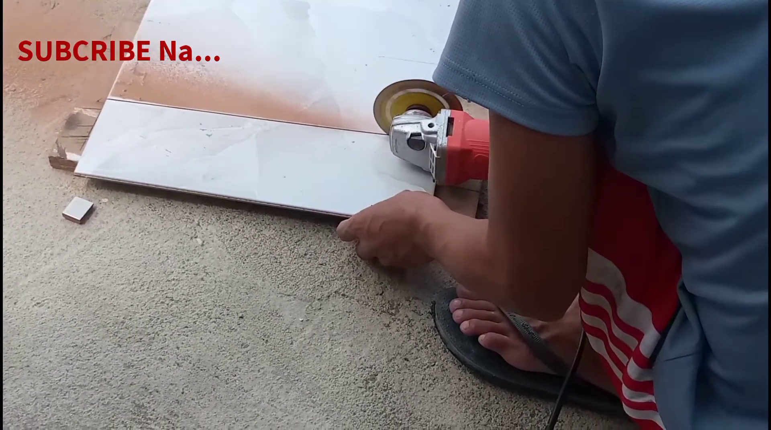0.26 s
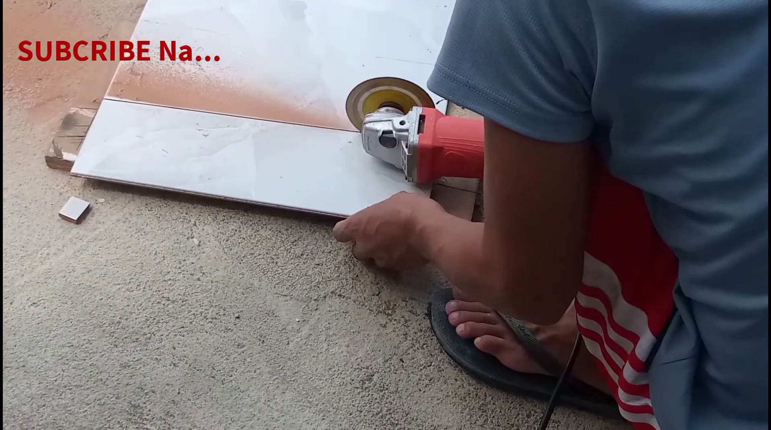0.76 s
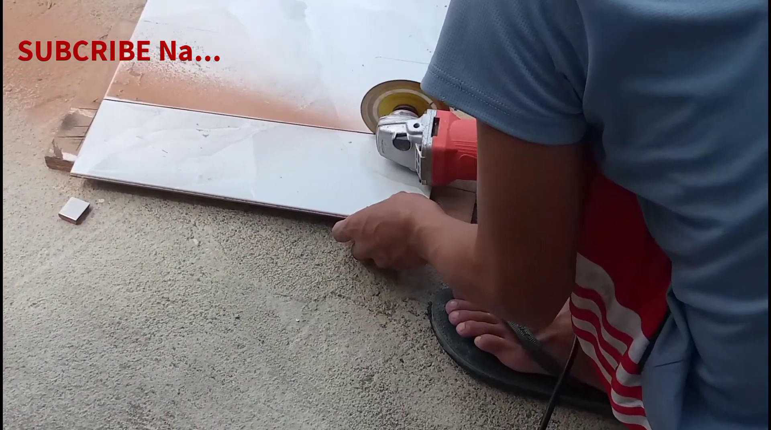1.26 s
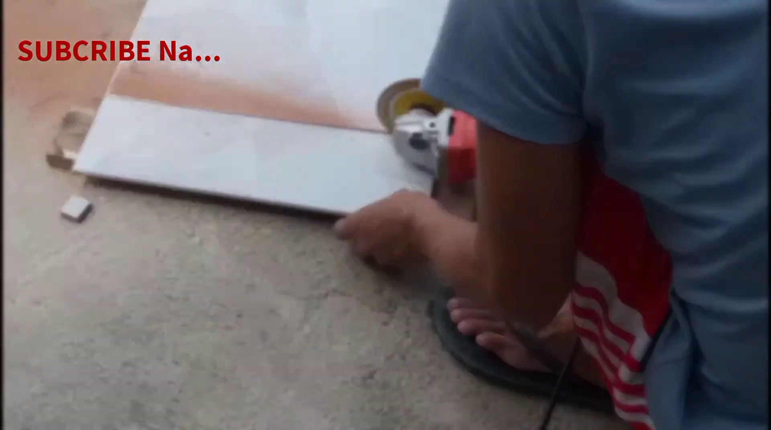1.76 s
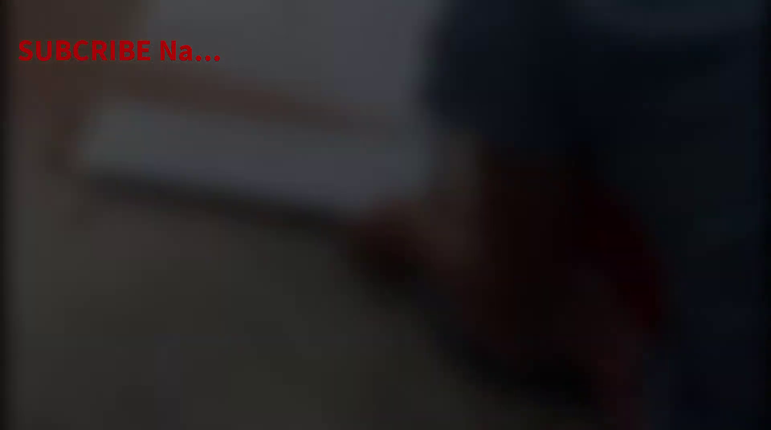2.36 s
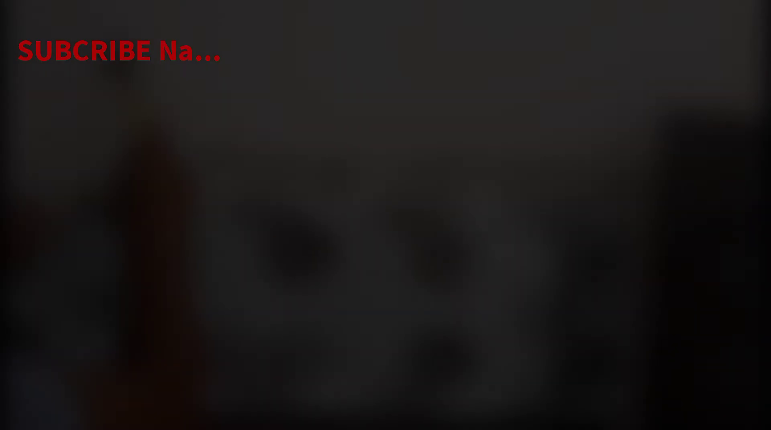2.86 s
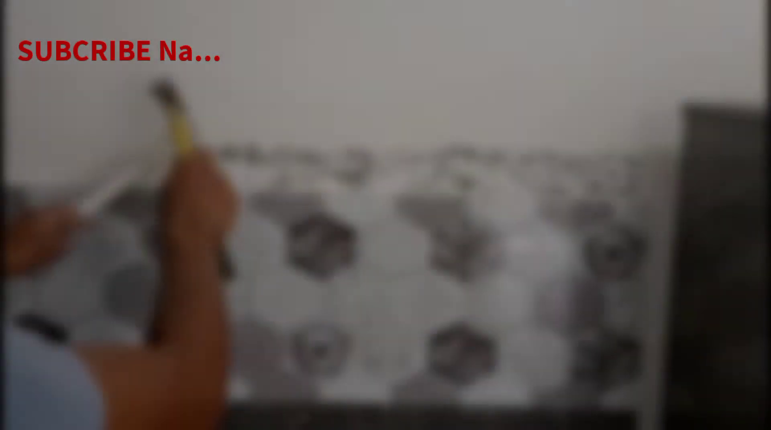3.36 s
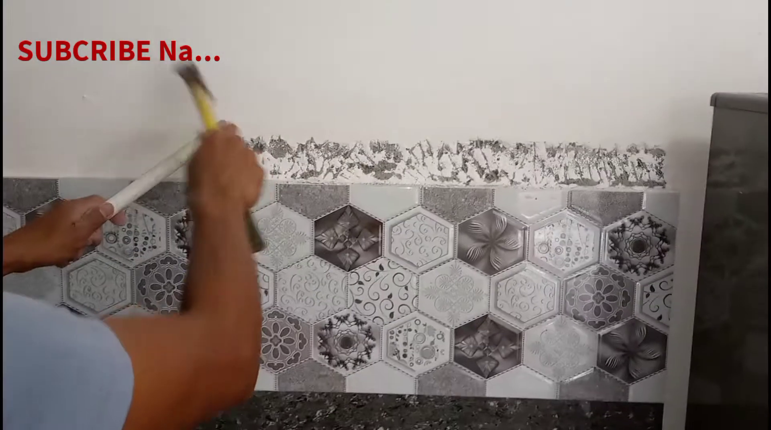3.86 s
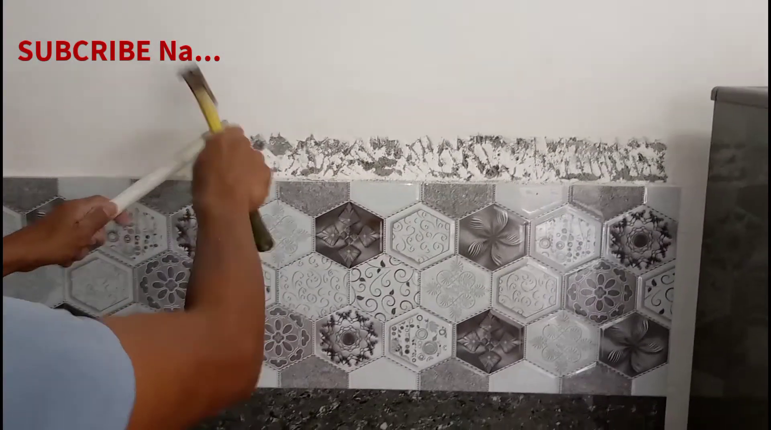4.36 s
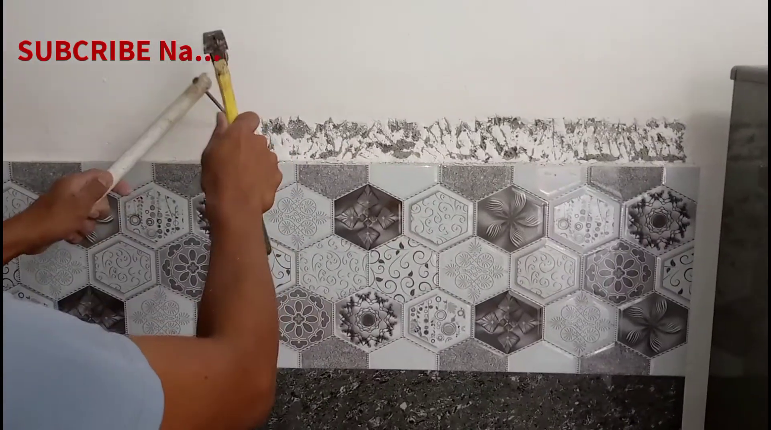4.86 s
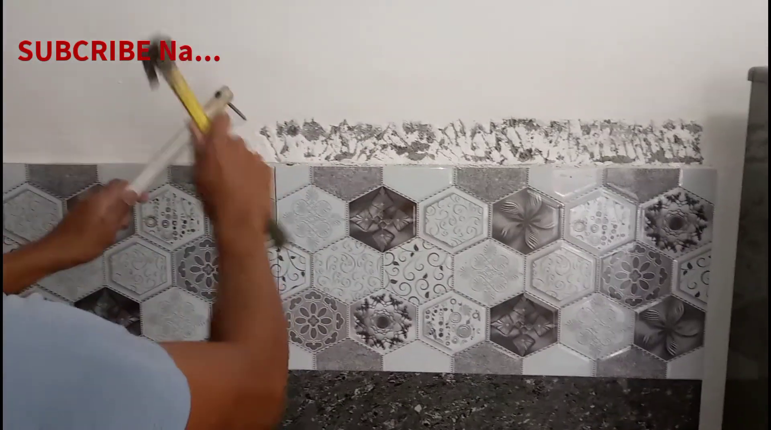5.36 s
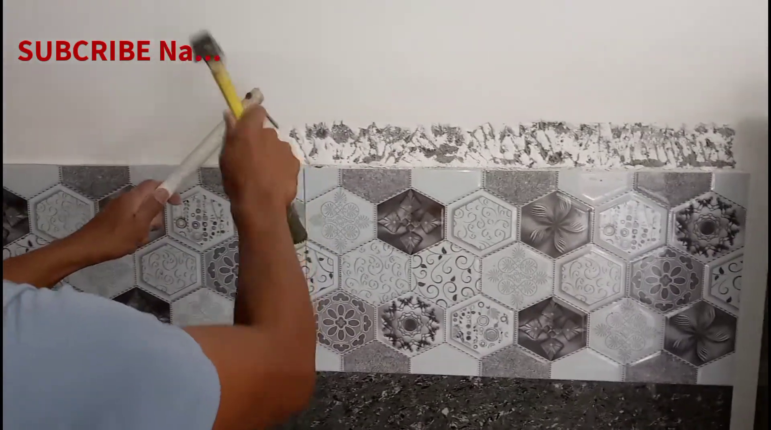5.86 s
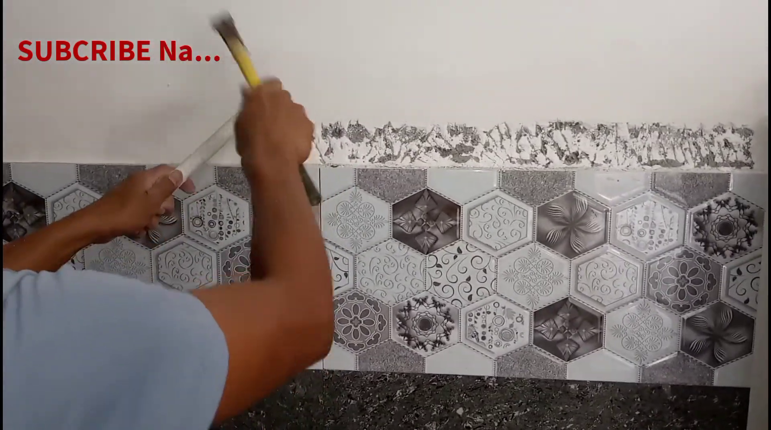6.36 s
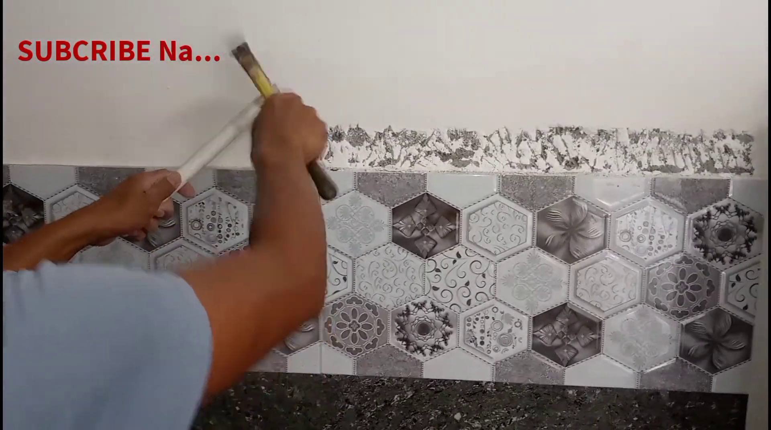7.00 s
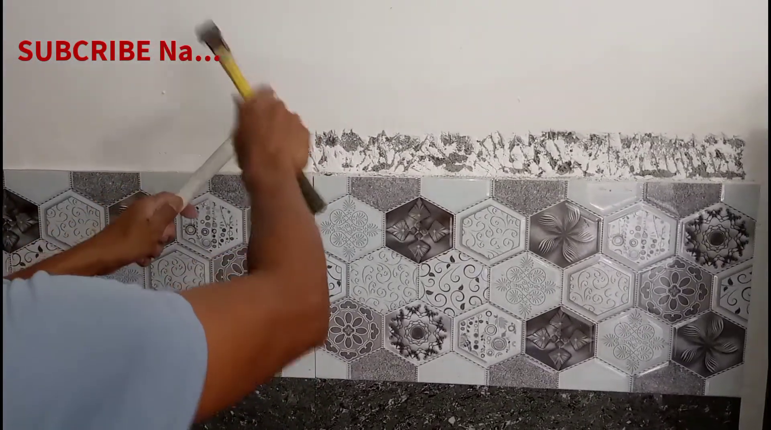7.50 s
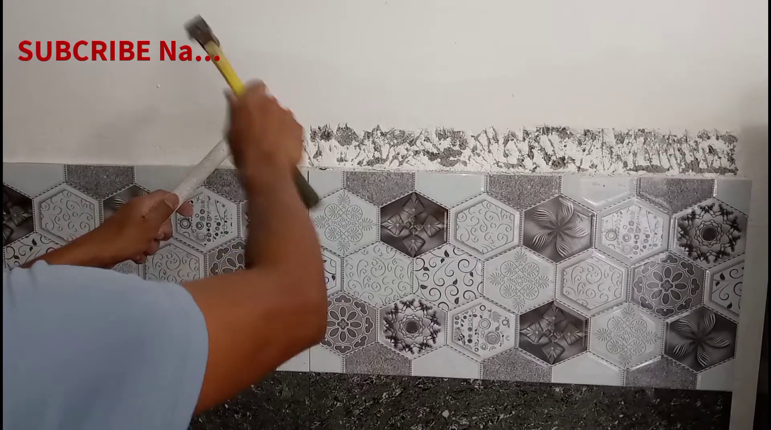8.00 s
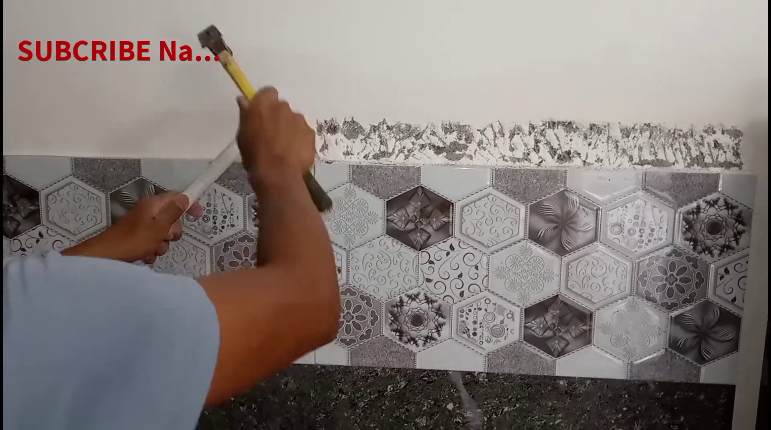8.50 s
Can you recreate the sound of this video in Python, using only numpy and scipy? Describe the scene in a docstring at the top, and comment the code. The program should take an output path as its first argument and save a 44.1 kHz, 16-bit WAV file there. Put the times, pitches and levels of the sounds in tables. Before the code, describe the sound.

A nearby angle grinder bites into a ceramic tile outdoors, gritty and shrill, squealing briefly as its pitch rises before it cuts off abruptly. After a short lull, the sound is indoors: a hammer hits a steel chisel against a plaster wall about four times a second. Six sharp, clinking blows echo in the bare room, then a pause with light ticks, then twelve more.

```python
"""An angle grinder cuts a ceramic tile outdoors, near the microphone: diamond grit scrapes, blade and tile
ring, the motor whines as its speed wavers and climbs. It stops dead. Then, in a bare echoing room,
a hammer drives a chisel into wall plaster, about four blows a second in two runs: steel clinks,
plaster cracks, the wall thuds. Small ticks come as the chisel is set again, over a faint hiss."""
import sys
import numpy as np
from scipy import signal
from scipy.io import wavfile

SR = 44100
rng = np.random.default_rng(int(sys.argv[2]) if len(sys.argv) > 2 else 0)


def generate_wav(sig):
    """Save sig (samples, or channels by samples) to the path in sys.argv[1] as 16-bit PCM at SR."""
    pcm = np.round(np.clip(np.atleast_2d(sig).T, -1, 1) * 32767).astype(np.int16)
    wavfile.write(sys.argv[1], SR, pcm)


N = 385434
TIME = np.arange(N) / SR
HZ = np.fft.rfftfreq(16384, 1 / SR)
STOP_S, ROOM_S = 2.685, 2.788  # the grinder ends, the room begins
CATCH_S = 2.197  # the blade binds in the cut
# speed of the blade: (time [s], speed [turns/s])
BLADE_SPEED = [(0.03, 114.47), (0.25, 114.8), (0.55, 116.67), (0.7, 119.97), (0.85, 125.6), (1.02, 125.9),
               (1.15, 121.9), (1.3, 121.13), (1.55, 122.1), (1.65, 124.17), (1.8, 125.67), (1.95, 125.7),
               (2.1, 127.77), (2.22, 127.87), (2.35, 132.17), (2.5, 136.2), (2.66, 139.73)]


def scrape(grains_per_s=9000, level_db=-15.5, split_hz=5700, freed_s=0.05):
    """Diamond grains strike the tile, hardest once a turn, and ring blade and tile."""
    # spectrum of grit on ceramic: (frequency [Hz], level [dB])
    spectrum = [(900, -44.5), (1500, -31), (2030, -14), (2520, -5.5), (3200, -5.5), (3650, -1.5),
                (4250, -1), (4800, -3.5), (5400, -11.5), (5900, -16.5), (7300, -16), (8100, -35.5),
                (13600, -29.5), (15400, -18.5)]
    # resonances of blade and tile: (frequency [Hz], width [Hz], gain [dB])
    modes = [(2490, 30, 3), (2588, 26, 5), (2790, 26, 2), (3069, 45, 0), (3509, 30, -4), (3640, 55, -7),
             (4118, 28, 4), (4635, 24, -1), (4793, 24, -3), (4997, 50, 4), (5251, 32, 4), (5654, 35, 6),
             (6570, 70, 0), (7050, 200, -1), (8370, 140, 1), (9650, 100, 9), (11320, 110, 3),
             (11850, 80, 10), (13480, 80, 10)]
    turns, load = np.cumsum(blade_speed()) / SR, load_db()
    grains = (rng.random(N) < grains_per_s / SR) * rng.choice([-1, 1], N)
    grains = grains * amp(np.minimum(rng.exponential(1, N), 5))
    wobble = 0.12 * np.cos(2 * np.pi * turns + 0.5 * wander(24))
    pressure = 1 + wobble + 0.045 * wander(700) + 0.078 * wander(50)
    grit = colour(pressure * (unit(grains) + 0.63 * rng.standard_normal(N)), amp(read(spectrum)))
    freed = np.clip((TIME - CATCH_S) / freed_s, 0, 1)  # past the catch the blade runs freer
    grit = grit - 0.36 * freed * colour(grit, hump(2350, 450))  # the tile's own band weakens
    drive_db = -5 + 1.4 * load - 9 * freed  # a deeper cut rings the modes harder
    # as the point of contact moves, each mode is fed more or less
    rung = grit + sum(colour(grit * amp(drive_db + db + 4.5 * wander(12)), hump(hz, width))
                      for hz, width, db in modes)
    treble = 1 / (1 + (split_hz / (HZ + 1)) ** 20)
    ringing = amp(load) * unit(colour(rung, 1 - treble))
    dust = amp(-7 + 0.69 * load) * unit(colour(rung, treble))
    return amp(level_db) * (ringing + dust)


def load_db(give_s=0.012, rebuild_s=0.16):
    """Bite of the cut: it eases as a flake of tile gives way, builds again, and grows a little with speed."""
    # flakes giving way: (time [s], drop [dB])
    flakes = [(.35, 1.5), (.6, 1.5), (.7, 1.5), (1.16, 2.5), (1.59, 0.5), (1.94, 2.5), (2.16, 4.5),
              (2.56, 2.5)]
    eased = sum(drop * np.clip((TIME - s) / give_s, 0, 1) * np.exp(-abs(TIME - s) / rebuild_s)
                for s, drop in flakes)
    return 0.0151 * overspeed() - eased


def motor(gear_order=10, fan_order=30, waver=0.0013):
    """Armature, gear and fan whine on multiples of the blade speed."""
    # lesser tones of the motor: (multiple of the blade speed, level [dB])
    tones = [(3.65, -58), (3.95, -59), (8, -55), (12, -55), (20, -41), (60, -46), (118.2, -45)]
    turns = np.cumsum(blade_speed() * (1 + waver * wander(60))) / SR
    whine = sum(gear_head(k) * amp(db + 3 * wander(12)) * np.sin(2 * np.pi * (k * turns + rng.random()))
                for k, db in tones)
    gear_db = -52 + 0.42 * overspeed() + 2.6 * wander(30)
    gear = gear_head(gear_order) * amp(gear_db) * unit(np.sin(2 * np.pi * gear_order * turns))
    fan = amp(-23.5 + 2 * wander(16)) * np.sin(2 * np.pi * fan_order * turns)
    return whine + gear + fan


def gear_head(order):
    """Gain of a motor tone as it sweeps through the resonances of the gear head."""
    # gear head resonances: (frequency [Hz], width [Hz], gain [dB])
    modes = [(533, 15, 11), (1154, 28, 13), (1265, 10, 11.5), (1324, 16, 16), (1417, 14, 15)]
    return np.interp(order * blade_speed(), HZ, resonances(modes))


def cooling_air():
    """Air rushes through the grinder, coloured by its tinny guard and housing."""
    # spectrum of the airflow: (frequency [Hz], level [dB])
    spectrum = [(25, -31), (70, -22.5), (150, -20), (338, -19), (420, -13), (700, -9.5), (900, -8),
                (1130, -4), (1550, -4), (2000, -5.5), (2600, -25), (4400, -63)]
    # resonances of guard and housing: (frequency [Hz], width [Hz], gain [dB])
    guard = [(480, 79, -2), (619, 26, 3), (740, 26, 3.5), (1003, 68, 3.5)]
    air = unit(colour(rng.standard_normal(N), amp(read(spectrum)) * resonances(guard)))
    return amp(-38.5 - 0.02 * overspeed() + wander(14)) * air


def singing(waver_hz=11):
    """Single modes of the tile swell and die as the blade rubs its edge."""
    # swells of the tile: (time [s], half length [s], frequency [Hz], level [dB])
    swells = [(0.196, 0.24, 792, -34), (0.115, .2, 5070, -22.5), (0.253, .15, 4118, -16),
              (.98, .1, 760, -46), (1.141, .04, 4960, -19), (1.427, 0.74, 732, -43.5),
              (1.55, .04, 4118, -21.5), (1.916, 0.056, 758, -37.5), (2.255, .1, 2600, -24.5)]
    out = np.zeros(N)
    for s, half_s, hz, db in swells:
        phase = 2 * np.pi * np.cumsum(hz + waver_hz * wander(60)) / SR
        swell = amp(db) / (1 + ((TIME - s) / half_s) ** 2) ** 2
        out += swell * (1 + 0.57 * wander(50)) * np.sin(phase)
    return out


def squeal(half_s=0.016, level_db=-10.5):
    """The binding blade rings on a few of its modes for a moment."""
    # modes of the binding blade: (frequency [Hz], width [Hz], gain [dB])
    modes = [(1690, 25, -14), (2590, 22, 0), (3050, 26, -1), (3450, 100, -3), (4120, 26, 2),
             (5650, 25, -12), (6260, 29, -7), (7000, 27, -9)]
    rub = rng.standard_normal(N) / (1 + ((TIME - CATCH_S) / half_s) ** 10)
    return amp(level_db) * colour(rub, unit(resonances(modes, base=0)))


def bumps(low_cut_hz=55):
    """Short dull low thumps with no ring, heard during the cut."""
    # low thumps: (time [s], level [dB], decay [s], upper edge [Hz])
    thumps = [(1.862, -43, 0.029, 300), (2.207, -29.5, 0.0037, 280), (2.559, -44, .02, 250),
              (2.595, -27, 0.0046, 800)]
    out, t = np.zeros(N), TIME[:SR // 4]
    for s, db, decay, top_hz in thumps:
        band = unit(HZ ** 2 / (HZ ** 2 + low_cut_hz ** 2) / (1 + (HZ / top_hz) ** 3))
        thump = colour(rng.standard_normal(len(t)) * np.exp(-t / decay), band)
        add(out, s, amp(db) * thump / np.sqrt(np.sum(thump ** 2) / (decay * SR)))
    return out


def hammer(same_paths=0.6, ring_t60=0.49, lag_s=0.0002):
    """Steel clinks on steel; each blow cracks plaster, thuds in the wall and rings the chisel."""
    # blows: (time [s], strength [dB], tip frequency [Hz], then relative tip [dB], thud [dB], dust [dB])
    blows = [(3.4484, -9, 5780, -15.5, -27.5, -25), (3.6935, -12.5, 6060, -13, -22.5, -16),
             (3.9302, -11, 6130, -12, -27.5, -34), (4.1982, -12.5, 6120, -9, -19.5, -19),
             (4.4516, -11, 6890, -16.5, -23.5, -18.5), (4.7, -8, 5870, -16, -29, -21.5),
             (5.6167, -5, 6370, -18, -31.5, -29), (5.883, -7.5, 6280, -16, -22.5, -24.5),
             (6.1443, -5, 5640, -24, -22, -29.5), (6.4076, -10, 5540, -40, -17.5, -27),
             (6.6577, -7.5, 6590, -39, -26, -41), (6.9166, -7, 6170, -16, -27.5, -29),
             (7.1906, -8.5, 5750, -18.5, -27.5, -28.5), (7.4458, -8, 6600, -15, -25.5, -25),
             (7.7094, -5.5, 6800, -40, -32.5, -36), (7.9624, -6, 6500, -18, -30, -20),
             (8.2295, -7.5, 6560, -17, -32, -18), (8.4882, -4.5, 5800, -23, -34, -36.5)]
    # chisel set on a new spot: (time [s], clink [Hz], clink [dB], chips [Hz], chips [dB], ring [dB])
    seats = [(3.0, 3430, -14.5, 12100, -27, -19), (5.5, 4030, -14, 11750, -24.5, -26)]
    # spectrum of cracking plaster: (frequency [Hz], level [dB])
    crack_spectrum = [(300, -27.5), (800, -10.5), (1300, -9), (2300, -1.5), (3700, 1), (4400, 0.5),
                      (5100, -7), (5600, -6.5), (6800, 0.5), (7500, -11), (8300, -17), (10000, -14.5),
                      (13300, -12), (15500, -10.5)]
    # spectrum of the wall's thud: (frequency [Hz], level [dB])
    thud_spectrum = [(25, -32), (50, -23), (75, 5.5), (110, -2.5), (140, -3), (170, -3), (330, -4),
                     (470, -4), (600, -3.5), (760, -9.5), (1200, -11), (3000, -34)]
    # standing waves between the walls: (frequency [Hz], width [Hz], gain [dB])
    room_modes = [(106, 7.9, 9.5), (163.3, 3.8, 14), (191, 2.7, 6.5), (210, 4.1, 5.5), (240, 9.1, 1),
                  (317, 7.6, -11), (337, 20, 7), (438, 18, 7.5), (527, 4.2, -13), (630, 14, 7),
                  (896, 23, 10)]
    # resonances of the seated chisel: (frequency [Hz], width [Hz], gain [dB])
    shaft_modes = [(3270, 120, 1), (4260, 150, -8), (5590, 36, 10.5), (5360, 48, 3)]
    # the chisel's long ring: (frequency [Hz], width [Hz], gain [dB])
    ring_modes = [(5570, 34, -4), (5660, 40, -4), (7330, 260, -8), (7510, 36, 0)]
    out, t = np.zeros(N), TIME[:SR]
    plaster, steel = unit(amp(read(crack_spectrum))), resonances(ring_modes, base=0) ** 2
    wall = unit(amp(read(thud_spectrum)) * resonances(room_modes) * resonances([(290, 110, 4)]))
    # part of the thud takes the same paths through the room at every blow
    common_boom = np.sqrt(same_paths) * room_impact(direct_db=-24)
    for s, strength, tip_hz, tip_db, thud_db, dust_db in blows:
        seated_s, clink_hz, clink_db, chip_hz, chip_db, ring_db = [r for r in seats if r[0] < s][-1]
        depth = sum(seated_s < row[0] < s for row in blows)  # blows since the chisel was set
        body = np.hypot(amp(-17) * plaster, amp(tip_db - 5) * unit(hump(tip_hz, 700) ** 2))
        crack = colour(room_impact(direct_db=7), body * resonances(shaft_modes))
        chips = chipping(depth, chip_hz, chip_db, thud_db, dust_db)
        face = hump(clink_hz * (1 + 0.05 * rng.standard_normal()), 520)  # no two blows land alike
        clink = amp(clink_db - 9) * colour(room_impact(direct_db=16), unit(plaster * face))
        boom = common_boom + np.sqrt(1 - same_paths) * room_impact(direct_db=-26)
        thud = amp(thud_db + 2) * colour(boom, wall)
        ring = amp(ring_db - 4 - 60 * t / ring_t60) * unit(colour(rng.standard_normal(SR), steel))
        add(out, s + lag_s, amp(strength) * (crack + chips + clink + thud + ring))
    return out


def chipping(depth, chip_hz, chip_db, thud_db, dust_db, sink_blows=2.55, usual_thud_db=-23):
    """One blow's snap of chips and dust; the chipping gets lower and fainter as the chisel sinks in."""
    pitch_drop = 0.145 * (1 - np.exp(-depth / sink_blows))
    level_db = chip_db - 0.73 * depth + 0.36 * (thud_db - usual_thud_db)  # a deeper blow chips more
    chips = amp(level_db) * unit(hump(chip_hz * (1 - pitch_drop), 1900) ** 3)
    dust = amp(dust_db - 5) * unit(hump(14950, 1300) ** 3)
    return colour(room_impact(direct_db=12), np.hypot(chips, dust))


def ticks(gain_db=-19):
    """The chisel touches the wall and chips fall, with the room behind them."""
    # light touches: (time [s], level [dB])
    touches = [(3.024, -36.5), (4.1705, -25), (5.008, -32.5), (5.0414, -33), (5.0584, -29.5), (5.0833, -32),
               (5.5692, -45), (8.465, -17)]
    # spectrum of a touch: (frequency [Hz], level [dB])
    spectrum = [(200, -29), (1500, -14), (3000, -11), (4300, -4.5), (5500, -14.5), (7000, -18), (8500, -33),
                (15000, -30)]
    out, tone = np.zeros(N), unit(amp(read(spectrum)))
    for s, db in touches:
        add(out, s, amp(db + gain_db) * colour(room_impact(direct_db=17, click=0.6, crack_s=0.002), tone))
    return out


def room_impact(direct_db, click=1.4, crack_s=0.0022, echo_s=0.0081, early_s=0.0089):
    """An impact at the microphone: click and fracture, an echo off a near wall, then the room's tail."""
    # reverberation of the bare room: (frequency [Hz], t60 [s])
    reverb_times = [(80, 0.43), (210, 0.42), (560, 0.54), (1470, 0.59), (3880, 0.52), (7000, 0.46),
                    (10200, 0.43), (15000, 0.35)]
    t = TIME[:SR]
    hz, when, bands = signal.stft(rng.standard_normal(SR), SR, nperseg=256)
    fill_s = 0.0024 + 5 / (hz[:, None] + 150)  # the bass takes longer to fill the room
    build = 1 - np.exp(-(when + 1e-4) / fill_s)
    decay = amp(-60 * when / read(reverb_times, hz)[:, None])
    tail = signal.istft(bands * build * decay, SR, nperseg=256)[1][:SR]
    fracture = np.exp(-t / crack_s) + amp(-6) * (t > echo_s) * np.exp(-abs(t - echo_s) / crack_s)
    near = (amp(direct_db) * fracture + amp(-2) * np.exp(-t / early_s)) * rng.standard_normal(SR)
    contact = np.arange(SR) == round(SR / 1000)
    return tail + near * np.minimum(t / 0.0018, 1) + click * amp(direct_db) * contact


def yard(x, echo_db=-11, reach_s=0.03, count=14):
    """Ground and nearby walls return a few quick echoes, which ripple the spectrum."""
    taps = np.zeros(SR // 4)
    delay = rng.uniform(0.02937, 1, count)
    taps[(delay * reach_s * SR).astype(int)] = rng.choice([-1, 1], count) * np.exp(-delay)
    taps *= amp(echo_db) / np.linalg.norm(taps)
    taps[0] = 1
    return signal.fftconvolve(x, taps / np.linalg.norm(taps))[:N]


def room_tone(hiss_db=-59, ring_db=-52.5, ring_hz=5698, ring_t60=0.64):
    """The faint hiss of the empty room, and a ring that hangs in it at first."""
    # spectrum of the hiss: (frequency [Hz], level [dB])
    spectrum = [(25, -35), (50, -26), (75, -23), (100, -22), (240, -20.5), (450, -19), (1000, -15.5),
                (1600, -14.5), (2600, -11.5), (4000, -15), (5000, -29.5), (6500, -28), (7700, -47),
                (15500, -60)]
    fade = amp(ring_db - 60 * np.maximum(TIME - ROOM_S, 0) / ring_t60)
    ring = fade * unit(colour(rng.standard_normal(N), hump(ring_hz, 500) ** 2))
    hiss = amp(hiss_db - 1.5 * wander(26)) * unit(colour(rng.standard_normal(N), amp(read(spectrum))))
    return ring + hiss


def blade_speed():
    """Turns per second at every sample."""
    return np.interp(TIME, *np.transpose(BLADE_SPEED))


def overspeed(cruise=125):
    """Turns per second above cruising speed."""
    return blade_speed() - cruise


def amp(db):
    """Decibels to gain."""
    return 10 ** (np.asarray(db) / 20)


def unit(x):
    """Scales to rms 1."""
    return x / np.sqrt(np.mean(abs(x) ** 2) + 1e-20)


def read(points, hz=HZ):
    """Reads a table on a log-frequency axis."""
    f, value = np.transpose(points)
    return np.interp(np.log(hz + 1), np.log(f + 1), value)


def add(mix, s, sound):
    """Mixes a sound in at time s."""
    part = mix[round(s * SR):][:len(sound)]
    part += sound[:len(part)]


def wander(per_s):
    """Smooth random drift of rms 1."""
    count = int(N / SR * per_s) + 4
    drift = signal.resample(rng.standard_normal(count), 4 * count)
    return unit(np.interp(TIME * per_s * 4, np.arange(4 * count), drift))


def hump(hz, width):
    """Gain of one resonance, 1 at its top."""
    return 1 / np.sqrt(1 + (2 * (HZ - hz) / width) ** 2)


def resonances(modes, base=1):
    """Gain of resonances that stand on an even base."""
    return np.sqrt(base + sum((amp(db) * hump(hz, width)) ** 2 for hz, width, db in modes))


def colour(x, gain):
    """Causal filter with the given gain, so that nothing rings before its cause."""
    log_gain = np.log(np.maximum(gain, 1e-6))
    mirrored = np.concatenate([log_gain, log_gain[-2:0:-1]])
    taps = np.fft.ifft(np.exp(np.conj(signal.hilbert(mirrored)))).real[:len(HZ)]
    return signal.fftconvolve(x, taps)[:len(x)]


def scene():
    """The grinder outdoors, a moment of silence, then the room; mono on both channels."""
    outdoors = yard(scrape()) + cooling_air() + motor() + singing() + squeal() + bumps()
    outdoors *= np.clip((STOP_S - TIME) / 0.0012, 0, 1)
    indoors = (hammer() + ticks() + room_tone()) * np.clip((TIME - ROOM_S) / 0.025, 0, 1)
    return np.tile(outdoors + indoors, (2, 1))


def record(dry, ceiling=0.76, low_cut_hz=48, top_hz=15520):
    """A small microphone loses the deepest bass; loud peaks are rounded and the top treble is cut."""
    thin = signal.sosfilt(signal.butter(3, low_cut_hz, "high", fs=SR, output="sos"), dry)
    lowpass = signal.firwin(511, top_hz, window=("kaiser", 8), fs=SR)
    return signal.oaconvolve(ceiling * np.tanh(thin / ceiling), lowpass[None], "same")


dry = scene()
out = record(dry)
generate_wav(out)
```